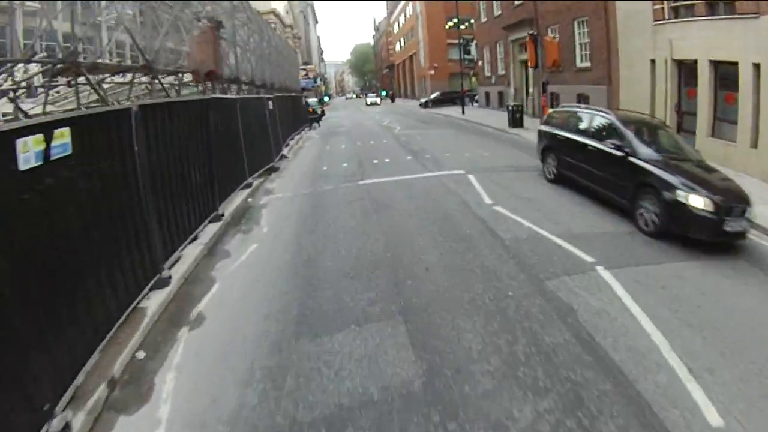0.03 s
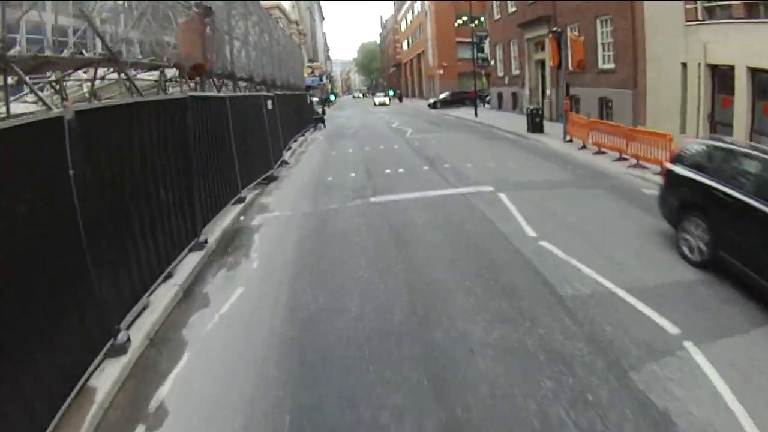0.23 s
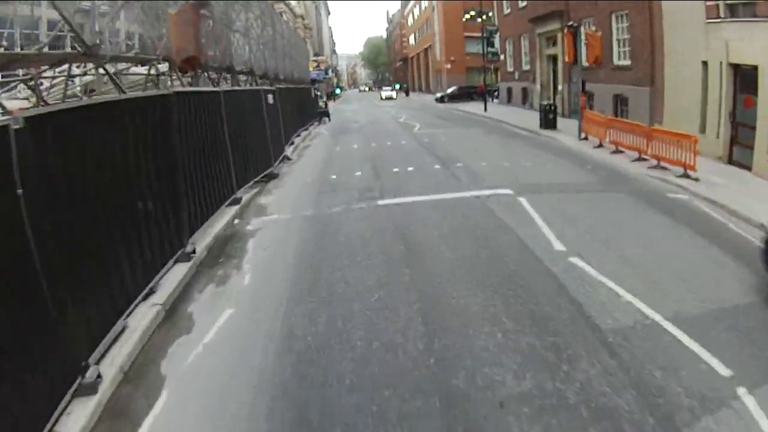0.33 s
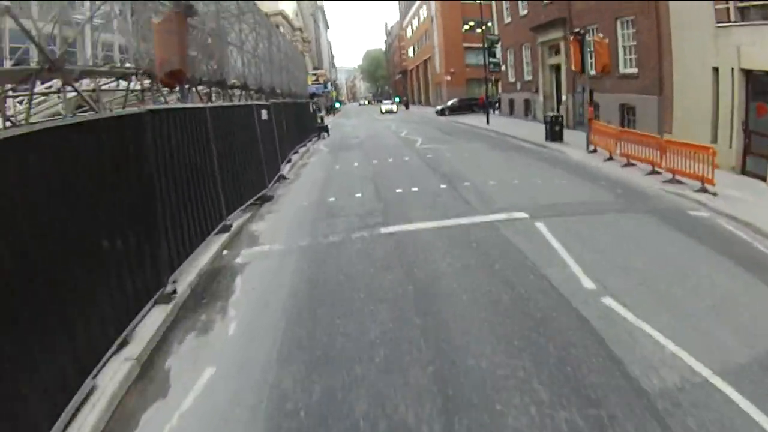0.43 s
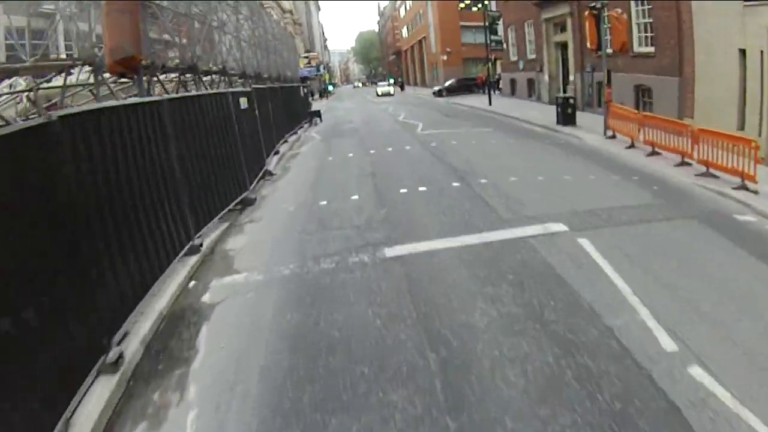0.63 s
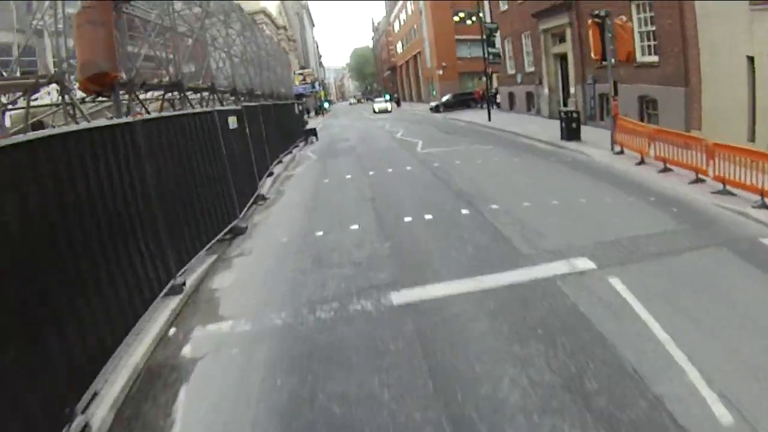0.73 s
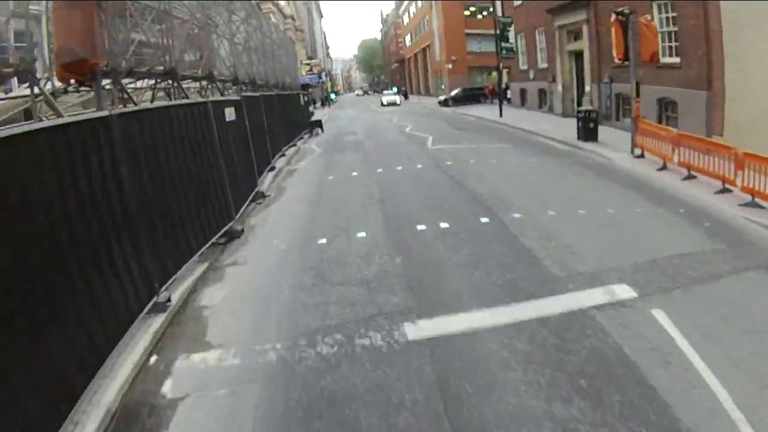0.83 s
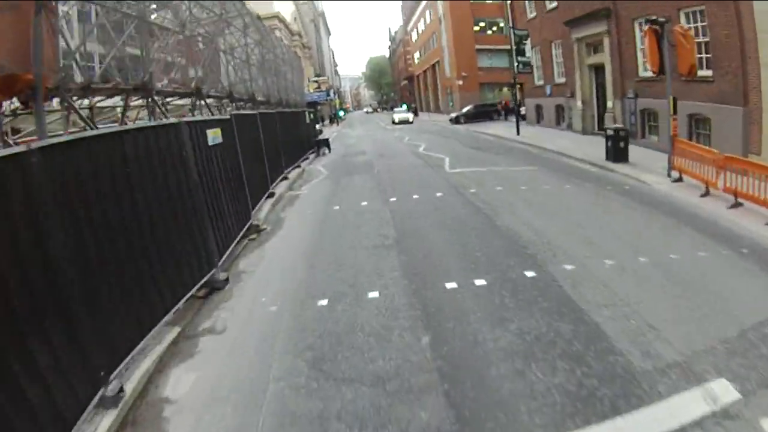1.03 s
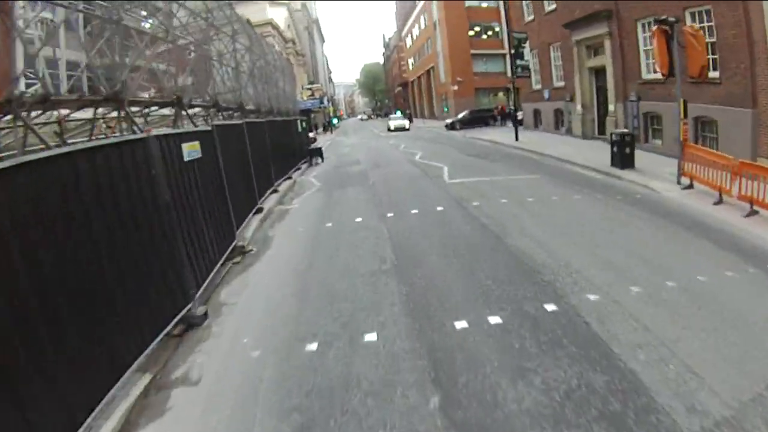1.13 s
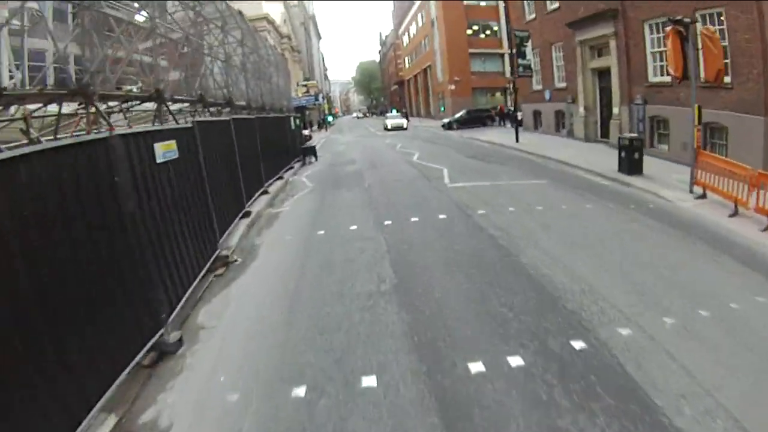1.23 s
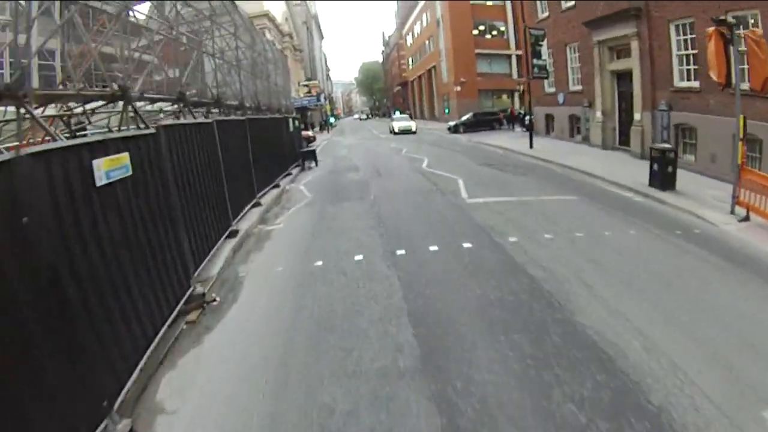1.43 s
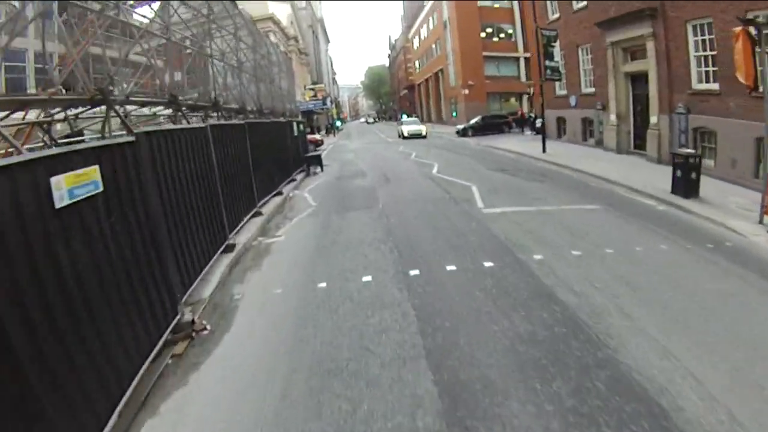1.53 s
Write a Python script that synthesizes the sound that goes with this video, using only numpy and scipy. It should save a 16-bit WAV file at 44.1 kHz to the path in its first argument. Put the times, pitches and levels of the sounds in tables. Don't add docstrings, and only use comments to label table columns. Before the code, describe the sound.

Bumps in rough tarmac knock a bicycle's handlebar camera mount: one hard, hollow thud at 0.28 seconds, weaker taps, then a cluster from 1.0 to 1.3 and a faint one at 1.5. Wind rumbles, its gusts cutting out with soft pops between 0.05 and 0.35. Tiny chain ticks, brief tyre tones and a faint squeak near 0.9 sit over muffled car hiss fading throughout.

```python
import sys
import numpy as np
from scipy import signal
from scipy.io import wavfile
from scipy.ndimage import uniform_filter1d

SR = 44100
rng = np.random.default_rng(int(sys.argv[2]) if len(sys.argv) > 2 else 0)


def master_out(mix):
    frames = np.transpose(np.atleast_2d(mix))
    ceiling = np.clip(frames, -1, 1)
    pcm = np.round(ceiling * 32767).astype(np.int16)
    wavfile.write(sys.argv[1], SR, pcm)


def magnitude_from_level(level_db):
    exponent = np.asarray(level_db, float) / 20
    return 10 ** exponent


N = 70560
TIME_S = np.arange(N) / SR


def rms_one(x):
    return x / np.sqrt(np.mean(x ** 2) + 1e-20)


def in_time(rows):
    return np.interp(TIME_S, *np.transpose(rows))


def at_hz(points, hz):
    f_hz, level_db = np.transpose(points)
    return np.interp(np.log(hz), np.log(f_hz), level_db)


def add(out, start_s, sound):
    i = int(start_s * SR)
    out[..., i:i + sound.shape[-1]] += sound[..., :N - i]


def sine(hz, t):
    return np.sin(2 * np.pi * hz * t)


def decay(level_db, t60_s, t):
    return magnitude_from_level(level_db - 60 * t / t60_s)


def narrow_noise(order, low_hz, high_hz, count):
    band = signal.butter(order, [low_hz, high_hz], "band", fs=SR, output="sos")
    return rms_one(signal.sosfilt(band, rng.standard_normal(count)))


def drift(rate_hz):
    r = np.exp(-2 * np.pi * rate_hz * 40 / SR)
    slow = signal.lfilter([1], [1, -2 * r, r * r], rng.standard_normal(N // 40 + 2002))
    slow = rms_one(slow[2000:])
    return np.interp(np.arange(N) / 40, np.arange(len(slow)), slow)


def banded_noise(spectrum, patchy_db, rate_hz):
    # f/Hz, correlation [1]
    likeness = [(60, .9995), (250, 1), (500, 1), (1000, 1), (2000, 1), (4000, 0.38), (8000, .42)]
    out, together = 0, drift(rate_hz)
    band_edges_hz = 20 * 2 ** (np.arange(39) / 4)
    white = rng.standard_normal((2, 2, N + 8000))
    for k, (low_hz, high_hz) in enumerate(zip(band_edges_hz, band_edges_hz[1:])):
        hz = np.sqrt(low_hz * high_hz)
        if not .9 * spectrum[0][0] < hz < 1.1 * spectrum[-1][0]:
            continue
        band = signal.butter(3, [low_hz, high_hz], "band", fs=SR, output="sos")
        mid, side = signal.sosfilt(band, white[k % 2])[:, 8000:]
        alike = np.clip(at_hz(likeness, hz), 0, 1)
        flicker_db = patchy_db * (0.3 * together + drift(rate_hz * 2))
        stereo = np.sqrt(1 + alike) * mid + np.sqrt(1 - alike) * side * [[1], [-1]]
        out = out + magnitude_from_level(at_hz(spectrum, hz) + flicker_db) * stereo
    return rms_one(out)


def knocks():
    # t/s, peak level/dB, thud f/Hz, housing ring level/dB
    bumps = [(0.2789, -16, 256.5, -6.5), (.381, -43, 333, -6), (0.5126, -44.5, 386, -2.5),
             (0.7926, -48, 240, -16), (0.9, -49, 223, -16), (1.001, -26, 237, -41),
             (1.108, -21.5, 241, -12), (1.2282, -32.5, 223, -16), (1.2676, -35, 500, -14),
             (1.2701, -37, 380, -21), (1.3095, -22.5, 240.7, -16), (1.5244, -36.5, 228, -34)]
    crack_band_hz = [700, 3500]
    thud_cycles, thud_swell = .345, 2.5
    ring_hz, ring_t60_s = 278, .075
    overtone, overtone_db, overtone_t60_s = 2.42, -8, .029
    frame_hz, frame_db, frame_t60_s, frame_late_s = 66, -12, .11, .0036
    frame2_hz, frame2_db, frame2_t60_s, frame2_late_s = 136, -13.5, .037, .0018
    crack_db, crack_s, crack_late_s = -39, .0015, .004
    out, t = np.zeros((2, N)), np.arange(SR // 5) / SR
    for s, db, hz, ring_db in bumps:
        u = t * hz / thud_cycles
        swell = (u / thud_swell) ** thud_swell * np.exp(thud_swell - u)
        thud = -swell * sine(hz, t)
        ring = -decay(ring_db, ring_t60_s, t) * (1 - np.exp(-u / 2)) * sine(ring_hz * hz / 250, t)
        add(out, s, magnitude_from_level(db) * (thud + ring))
        high_ring = decay(db + ring_db + overtone_db, overtone_t60_s, t) * (1 - np.exp(-u))
        add(out, s + .0015, -high_ring * sine(overtone * hz, t))
        add(out, s + frame_late_s, -decay(db + frame_db, frame_t60_s, t) * sine(frame_hz, t))
        add(out, s + frame2_late_s, decay(db + frame2_db, frame2_t60_s, t) * sine(frame2_hz, t))
        crack = narrow_noise(2, *crack_band_hz, len(t)) * np.exp(-t / crack_s)
        add(out, s + crack_late_s, magnitude_from_level(db + crack_db) * crack)
    return out


def ticks():
    # t/s, peak level/dB, centre f/Hz, length/s, spread/octaves
    contacts = [(0.031, -57.5, 7400, 0.0035, 0.17), (0.092, -58.5, 6000, .007, 1),
                (.155, -68, 8000, .005, .4), (0.286, -60.5, 8000, .004, .6), (0.333, -66, 9500, .003, .3),
                (.5412, -63, 5000, .004, .8), (.615, -71, 7000, .004, .5), (.7801, -58.5, 6500, .004, 1),
                (1.0455, -58.5, 6800, .004, 0.72), (1.116, -60.5, 6700, .004, .6),
                (1.1907, -68, 6900, .003, .4), (1.2366, -67, 5000, .004, .8),
                (1.3603, -58.5, 6740, .004, .8), (1.594, -69, 7000, .004, .7)]
    # f/Hz, level/dB, t60/s
    links = [(4200, -7, .007), (5500, 0, .007), (6100, 1, .006), (7300, -2, .007), (8700, 0, .005),
             (9900, -4, .004), (11500, -10, .004)]
    out, t = np.zeros((2, N)), np.arange(2000) / SR
    for s, db, centre_hz, length_s, spread_oct in contacts:
        u = t / length_s
        grit = rng.standard_normal(2000) + .6 * rng.standard_normal((2, 2000))
        flurry = grit * u * np.exp(-2 * u ** 2)
        tick = 0
        for hz, link_db, t60_s in links:
            r, w = magnitude_from_level(-60 / (t60_s * SR)), 2 * np.pi * hz / SR
            off_db = -6 * (np.log2(hz / centre_hz) / spread_oct) ** 2
            mode = signal.lfilter([0, np.sin(w)], [1, -2 * r * np.cos(w), r * r], flurry)
            tick = tick + magnitude_from_level(link_db + off_db) * mode
        add(out, s - length_s / 4, magnitude_from_level(db) * tick / np.abs(tick.mean(0)).max())
    return out


def squeak():
    hz, half_width_hz, level_db, mid_s, half_span_s = 5450, 200, -90.5, .9, .16
    swell = np.exp(-((TIME_S - mid_s) / half_span_s) ** 4)
    return magnitude_from_level(level_db) * swell * narrow_noise(2, hz - half_width_hz, hz + half_width_hz, N)


def tyres():
    # middle t/s, half span/s, f/Hz, half width/Hz, level/dB
    songs = [
        (.14, .04, 1650, 60, -62),
        (.21, .05, 950, 60, -64),
        (.53, .04, 1450, 70, -64),
        (.74, .06, 1200, 80, -65),
        (.92, .09, 1580, 110, -62),
    ]
    out = 0
    for mid_s, half_span_s, hz, half_width_hz, db in songs:
        swell = np.exp(-((TIME_S - mid_s) / half_span_s) ** 2)
        out = out + magnitude_from_level(db) * swell * narrow_noise(1, hz - half_width_hz, hz + half_width_hz, N)
    return out


def wind():
    # t/s, level/dB
    gusts = [(0, -64), (.055, -53), (.11, -45.5), (.17, -61.5), (.23, -50.5), (.34, -53), (.41, -48.5),
             (.46, -65.5), (.55, -55), (.63, -61), (.76, -73), (.81, -54), (.87, -64.5), (1.0, -52.5),
             (1.17, -54.5), (1.36, -67), (1.45, -57.5), (1.6, -53.5)]
    # f/Hz, level/dB
    rumble = [(22, -12), (40, -2.5), (60, -4.5), (85, -9.5), (150, -18.5), (300, -39.5)]
    return magnitude_from_level(in_time(gusts)) * banded_noise(rumble, patchy_db=1.5, rate_hz=9.0)


def airstream():
    # t/s, level/dB
    flow = [
        (0.0, -78),
        (0.088, -77),
        (0.498, -84.5),
        (0.97, -83.5),
        (1.376, -85.5),
        (1.6, -86.5),
    ]
    # f/Hz, level/dB
    hiss = [(2000, 2.5), (3000, 3), (4500, 2.8), (6500, 0), (9000, -2.5), (12500, -7), (16000, -20)]
    return magnitude_from_level(in_time(flow) + 4.0) * banded_noise(hiss, patchy_db=0.65, rate_hz=9.7)


def traffic():
    # t/s, level/dB
    passing = [
        (0.0, -50.5),
        (0.796, -55),
        (1.368, -58.5),
        (1.6, -59.5),
    ]
    # f/Hz, level/dB
    road = [(150, -9.5), (260, -0.5), (400, -6), (600, -4), (1600, -3.5), (2200, -13.5), (2800, -30),
            (3500, -35.5)]
    return magnitude_from_level(in_time(passing) + 1.6) * banded_noise(road, patchy_db=1.6, rate_hz=5.0)


def scene():
    bicycle = knocks() + ticks() + squeak() + tyres()
    return bicycle + wind() + airstream() + traffic()


def overload(dry):
    # start t/s, length/s
    freezes = [
        (.0543, .0028),
        (.0695, .0184),
        (.1058, .0137),
        (.2274, .0073),
        (.2562, .0135),
        (.3043, .0082),
        (.3361, .0112),
    ]
    # going-in level/dB, coming-out level/dB, side of the swing [+1/-1]
    swings = [
        (-29, -28, 1),
        (-31.5, -33, -1),
        (-29, -32, 1),
        (-32, -32, 1),
        (-31.5, -48, -1),
        (-32.5, -33, 1),
        (-32.5, -43, -1),
    ]
    snap_levels_db = [-25, -31]
    right_early_s, right_late_s, low_cut_hz, leak_db = .00044, .00042, 270, -77.5
    snap_s, snap_width_s = .0537, .00023
    gate, pops, t = np.ones((2, N)), np.zeros((2, N)), np.arange(SR // 50) / SR
    w = 2 * np.pi * low_cut_hz / np.sqrt(2)
    pop = np.exp(np.pi / 4 - w * t) * np.sin(w * t) * np.sqrt(2)
    for (s, length_s), (in_db, out_db, side) in zip(freezes, swings):
        end_s = s + length_s
        spans_s = [(s + right_early_s, end_s), (s, end_s + right_late_s)]
        for ch, (a, b) in enumerate(spans_s):
            gate[ch, int(a * SR):int(b * SR)] = magnitude_from_level(leak_db)
            add(pops[ch], a, side * magnitude_from_level(in_db) * pop)
            add(pops[ch], b, side * magnitude_from_level(out_db) * pop)
    fall = np.where(t > 2 * snap_width_s, 2, 1)
    snap = np.exp(-np.abs(t / snap_width_s - 2) * fall)
    add(pops, snap_s, -magnitude_from_level(snap_levels_db)[:, None] * snap)
    return dry * uniform_filter1d(gate, size=9, axis=1) + pops


def roll_off(x):
    return signal.sosfilt(signal.butter(12, 12900, fs=SR, output="sos"), x)


def record(dry):
    soft_top = .45
    rounded = soft_top * np.tanh(dry / soft_top)
    return roll_off(overload(rounded))


dry = scene()
out = record(dry)
master_out(out)
```